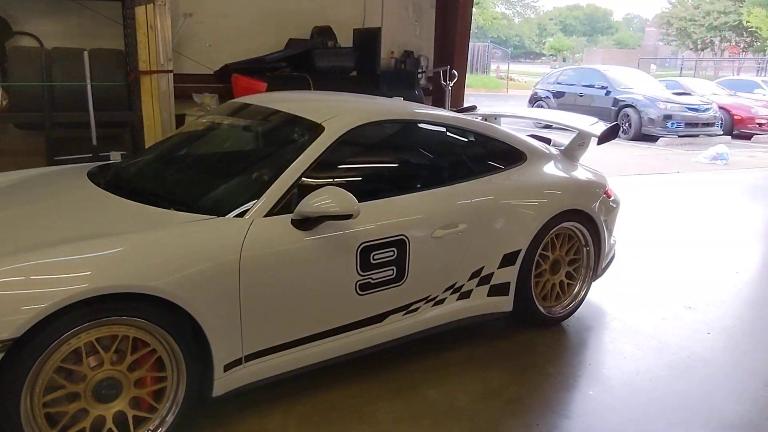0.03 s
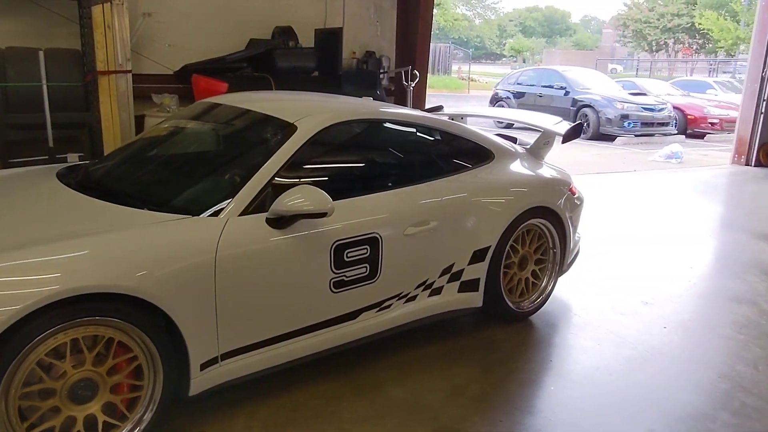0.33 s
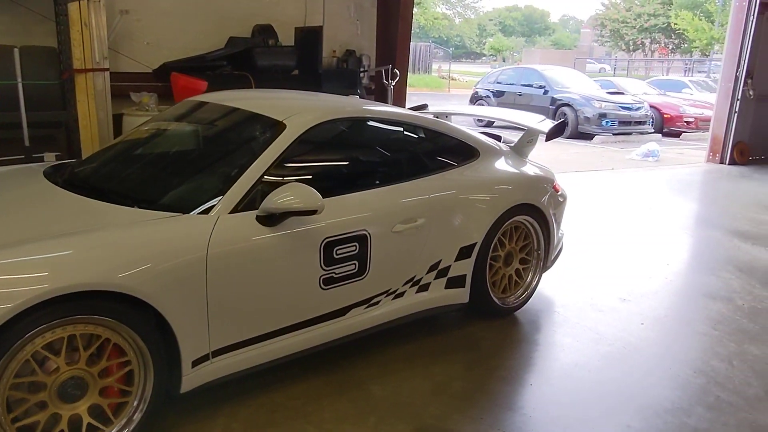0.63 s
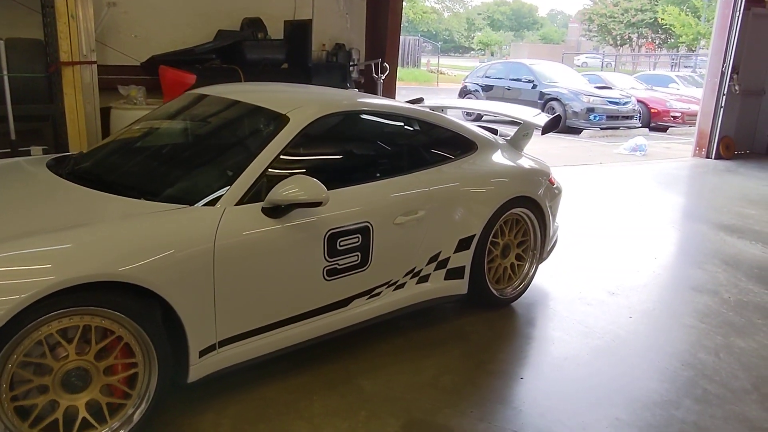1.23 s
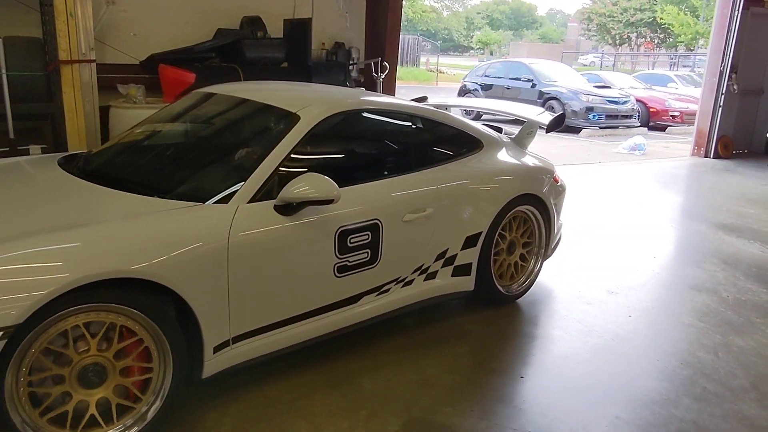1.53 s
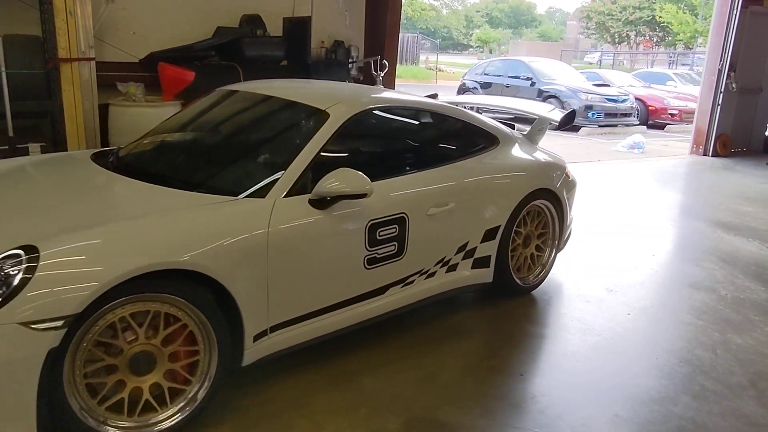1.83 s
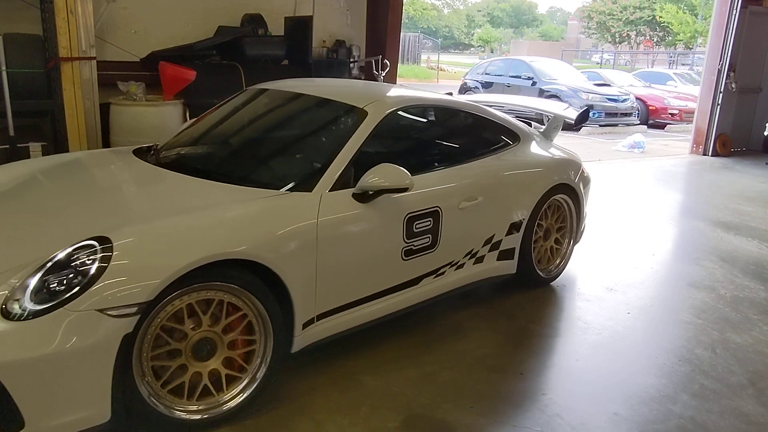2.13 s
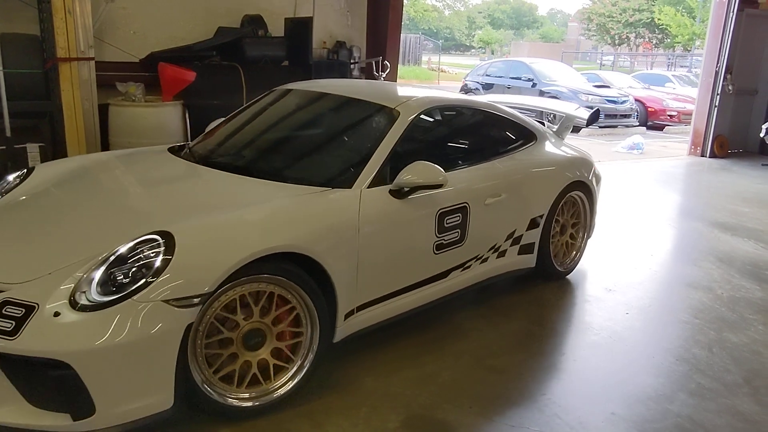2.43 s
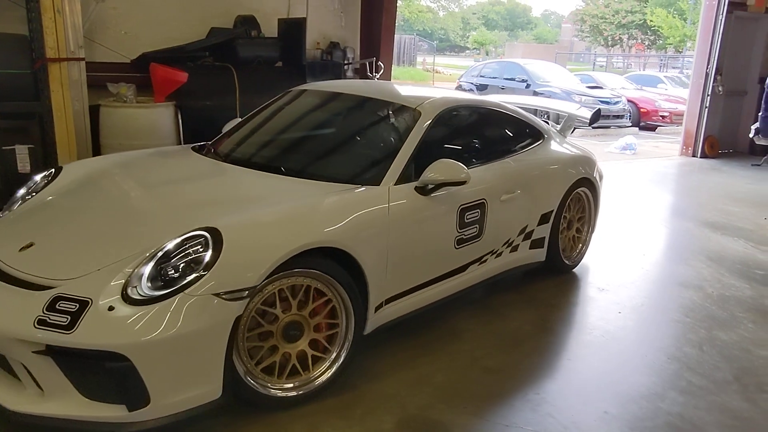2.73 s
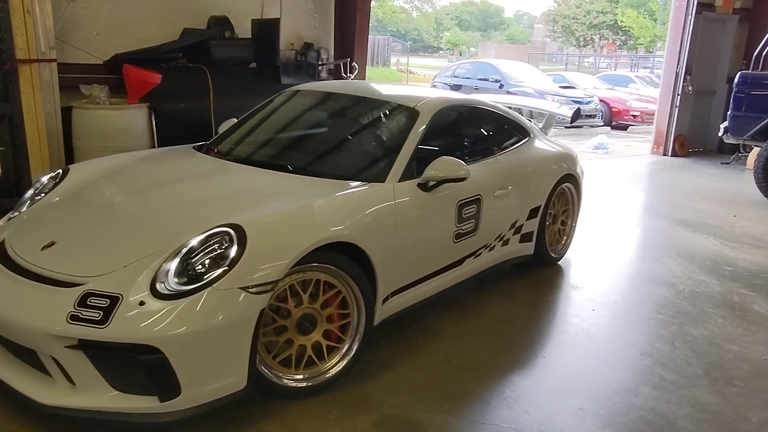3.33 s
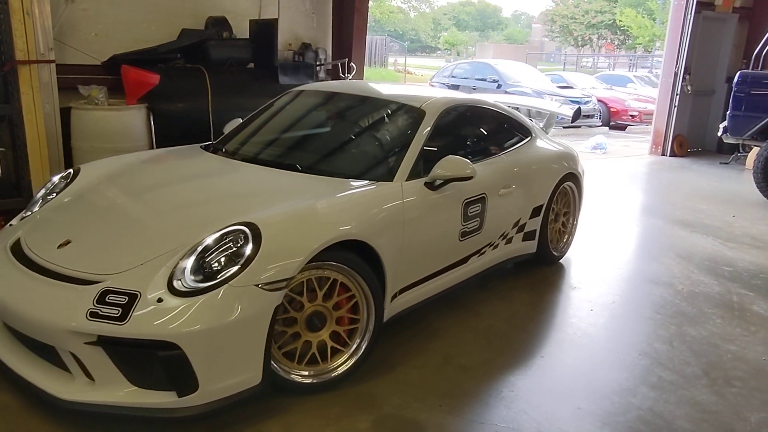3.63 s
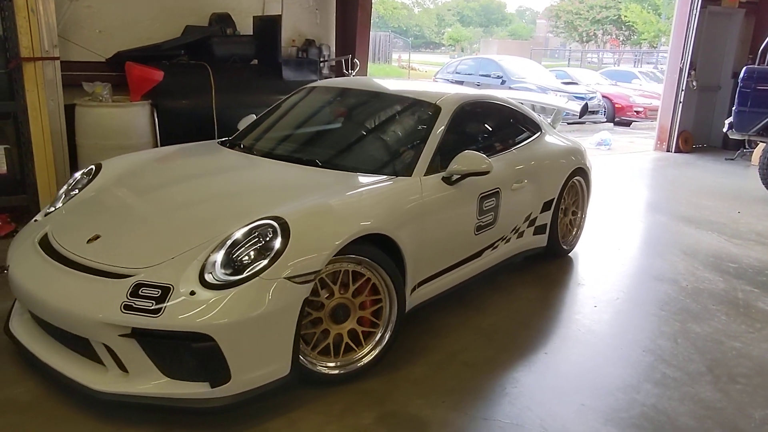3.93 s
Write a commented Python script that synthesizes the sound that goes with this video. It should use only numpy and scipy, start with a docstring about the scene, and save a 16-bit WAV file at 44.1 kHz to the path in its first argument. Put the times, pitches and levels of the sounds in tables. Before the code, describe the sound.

Low, burbling sports car engine runs as the car creeps along, tyres squeaking on smooth floor.

```python
"""A six-cylinder sports car creeps backwards out of a garage. It starts at idle: the exhaust drones,
uneven firings burble in the pipe, and the engine whirs and hisses. A soft scuff on the floor ends near
1 s, then the revs lift. From about 2 s they sag under the clutch while a tyre rubs and squeaks on the
smooth floor. The drone's tones swell and fade as the car moves through the room's standing waves
(its loud and quiet spots). In the last half second the revs recover."""
import sys
import numpy as np
from scipy import signal
from scipy.fft import rfft, irfft, next_fast_len
from scipy.io import wavfile
from scipy.ndimage import uniform_filter1d, minimum_filter1d, map_coordinates

SR = 44100
rng = np.random.default_rng(int(sys.argv[2]) if len(sys.argv) > 2 else 0)


def digitize_waveform(pressure):
    """Quantize a signal to 16-bit integers and store it at the path in sys.argv[1].

    Rows of a 2-D input are taken as channels; values are limited to [-1, 1].
    """
    field = np.atleast_2d(pressure).T
    bounded = np.clip(field, -1, 1)
    quanta = np.round(bounded * 32767).astype(np.int16)
    wavfile.write(sys.argv[1], SR, quanta)


N = 176400  # 4 s
TIME = np.arange(N) / SR


def amp(db):
    """Turn decibels into a gain."""
    return 10 ** (np.asarray(db) / 20)


def unit(x):
    """Scale a sound to an average (rms) size of 1."""
    return x / np.sqrt(np.mean(x ** 2) + 1e-20)


def along(points, hz):
    """Read a frequency table between its rows, on a log axis."""
    f, values = np.transpose(points)
    return np.interp(np.log(hz + 1), np.log(f + 1), values)


def curve(rows, column=1):
    """Read one column of a time table at every sample."""
    columns = np.transpose(rows)
    return np.interp(TIME, columns[0], columns[column])


def wobble(rate):
    """A smooth curve through `rate` random points a second."""
    return map_coordinates(rng.standard_normal(int(N * rate / SR) + 4), [TIME * rate])


def filtered(x, response):
    """Turn each frequency up or down by response(hz)."""
    size = next_fast_len(N + SR // 2)
    return irfft(rfft(x, size) * response(np.fft.rfftfreq(size, 1 / SR)), size)[..., :N]


def pan(db):
    """Add db on the left and take as much off the right."""
    return amp([[db], [-db]])


# How alike left and right are: f/Hz, likeness (1 = the same)
LIKENESS = [(60, .99), (250, 0.99), (500, 0.72), (1000, 0.49), (2000, 0), (6000, 0), (15000, 0)]

def rush(spectrum, pulse=1):
    """Stereo noise of size 1, pulsed and then given its tone colour."""
    def response(hz):
        width = np.arccos(np.clip(along(LIKENESS, hz), -1, 1)) / 2
        return amp(along(spectrum, hz)) * [np.cos(width), np.sin(width)]
    mid, side = filtered(pulse * rng.standard_normal((2, N)), response)
    return unit(np.array([mid + side, mid - side]))


# How long the echo takes to fall by 60 dB: f/Hz, t/s
ECHO_TIME = [(100, 0.78), (1000, 0.64), (4000, 0.69), (12000, 0.32)]

def garage(x):
    """The garage walls blur a sound into a stereo echo."""
    hz, t, noise = signal.stft(rng.standard_normal((2, SR)), SR, nperseg=256)
    fade = amp(-60 * t / along(ECHO_TIME, hz)[:, None])
    tail = signal.istft(noise * fade, SR, nperseg=256)[1]
    return signal.fftconvolve(x[None], tail / np.linalg.norm(tail[0]), axes=1)[:, :len(x)]


# Loudness of the whine: t/s, level/dB
WHINE_LEVEL = [(0, -80), (1.4, -72), (2.4, -68), (3.3, -65), (4, -70)]

def whine(pitch_hz=15109):
    """A faint, thin, very high tone."""
    return amp(curve(WHINE_LEVEL)) * np.sin(2 * np.pi * pitch_hz * TIME + wobble(30))


# Loudness of the hiss before its boosts: t/s, lower level/dB, upper level/dB
HISS_LEVEL = [(0, -56, -55), (.5, -54, -54), (1.05, -51, -54), (1.45, -48.5, -51), (1.8, -51, -48.5),
              (2.3, -54, -53), (2.55, -49, -53.5), (2.8, -55, -57.5), (3.12, -57.5, -59.5),
              (3.25, -50, -53.5), (3.6, -50.5, -53), (3.9, -47, -47.5)]
# Tone colour of the lower and upper hiss: f/Hz, level/dB
HISS_LOW = [(2000, -24), (3000, 3), (3700, -2), (4300, 1.5), (4800, -2), (5800, -1), (6700, 1.5),
            (7300, -0.5), (8000, -18), (10000, -34)]
HISS_HIGH = [(6000, -16), (7800, -2.5), (9000, 1), (9900, -3), (11100, -5.5), (11600, -0.5), (13000, -2),
             (15000, 0.5), (15700, -5)]

def hiss(cycles):
    """The engine bay hisses, pulsing faintly with every second firing."""
    pulse = 1 + .055 * np.cos(np.pi * cycles)
    lower = amp(curve(HISS_LEVEL) + 2) * rush(HISS_LOW, pulse)
    upper = amp(curve(HISS_LEVEL, column=2) + 4) * rush(HISS_HIGH, pulse)
    return lower + pan(-.6) * upper


# Loudness of the ringing: t/s, level/dB
RING_LEVEL = [(0, -47.5), (1.2, -47), (1.85, -43.5), (2.2, -48), (3, -54), (4, -46)]

def engine_ring(pitch_hz=1413, half_width_hz=42):
    """The engine's shaking keeps one narrow note ringing."""
    noise = rng.standard_normal((2, N))
    ring = filtered(noise, lambda hz: 1 / (1 + 1j * (hz - pitch_hz) / half_width_hz) ** 2)
    return amp(curve(RING_LEVEL)) * unit(ring)


# Tone colour of the scuff: f/Hz, level/dB
SCUFF_COLOUR = [(600, -24), (900, -4.5), (1200, 4), (1600, -11), (3200, -13), (5000, -20.5), (6500, -11.5),
                (8000, -22), (15000, -31)]

def scuff(start_s=.57, rise_s=.14, end_s=1.03, fall_s=.09, level_db=-40.5):
    """A soft rub on the floor rises, holds and falls."""
    shape = np.clip(np.minimum((TIME - start_s) / rise_s, (end_s - TIME) / fall_s), 0, 1)
    return amp(level_db) * shape * rush(SCUFF_COLOUR)


# Loudness of the rubbing: t/s, level/dB
RUB_LEVEL = [(0, -68), (2.15, -63), (2.45, -41), (2.8, -42.5), (3.08, -50), (3.27, -35.5), (3.6, -45.5),
             (3.9, -36), (4, -33)]
# Tone colour of the rubber: f/Hz, level/dB
RUB_COLOUR = [(550, -31), (770, -11), (865, 7), (940, -7), (1030, 3.5), (1180, -9), (1500, -25),
              (2000, -11.5), (3000, -35)]

def tyre_rub():
    """The tyres rub over the floor."""
    return amp(curve(RUB_LEVEL)) * rush(RUB_COLOUR)


# One squeak a row: start t/s, length t/s, first f/Hz, last f/Hz, level/dB, relative overtone level/dB
SQUEAKS = [(2.246, .06, 850, 880, -45, -14), (2.318, 0.092, 1040, 1090, -37, -12),
           (2.385, 0.12, 900, 896, -33, -15), (2.456, 0.045, 910, 967, -34, -3.5),
           (2.479, 0.042, 970, 1074, -30, -12), (2.528, 0.034, 1060, 1010, -29.5, -15),
           (2.579, 0.049, 1036, 1090, -38, -18), (2.585, 0.067, 893, 866, -30.5, -20),
           (3.237, 0.097, 860, 865, -36.5, -20), (3.311, 0.067, 770, 830, -43, -20)]

def tyre_squeaks(roughness=.035, echo_db=-7):
    """Rubber sticks and slips on the floor in short gliding squeaks that echo in the garage."""
    out = np.zeros(N)
    unsteady = 1 + roughness * wobble(250)
    for start, length, from_hz, to_hz, db, overtone_db in SQUEAKS:
        progress = np.clip((TIME - start) / length, 0, 1)
        pitch_hz = (from_hz + (to_hz - from_hz) * progress) * unsteady
        phase = 2 * np.pi * np.cumsum(pitch_hz) / SR
        tone = np.sin(phase) + amp(overtone_db) * np.sin(2 * phase)
        out += amp(db) * np.sin(np.pi * progress) * tone
    return out + amp(echo_db) * garage(out)


# Loudness of the whir before its boost: t/s, lower level/dB, upper level/dB
WHIR_LEVEL = [(0, -41.5, -47.5), (.5, -40, -47), (1.2, -41, -42), (1.8, -37.5, -42.5), (2.15, -39, -44),
              (2.4, -43, -44), (2.52, -44, -44), (2.7, -43.5, -44.5), (3.1, -45, -47.5), (3.3, -40, -42),
              (3.6, -38, -41), (3.9, -34, -39.5)]
# Tone colour of the lower and upper whir: f/Hz, level/dB
WHIR_LOW = [(100, -21), (300, 4), (450, 1), (600, -3.5), (720, 1.5), (850, -4), (950, -7.5), (1100, -8.5),
            (1400, -34.5), (2500, -39)]
WHIR_HIGH = [(500, -34.5), (900, -2), (1250, -2), (1420, 0.5), (1560, -8), (1750, -3.5), (2100, -5.5),
             (2350, -2.5), (2650, -12), (3200, -17), (4000, -34), (8000, -68)]

def whir(cycles, boost_db=4.5):
    """Flowing gas and moving parts whir, pulsing faintly with every second firing."""
    pulse = 1 + .09 * np.cos(np.pi * cycles)
    lower = amp(curve(WHIR_LEVEL)) * rush(WHIR_LOW, pulse)
    upper = amp(curve(WHIR_LEVEL, column=2)) * rush(WHIR_HIGH, pulse)
    return amp(boost_db) * (lower + upper)


# How much stronger or weaker than average each cylinder puffs (relative)
PUFF_OFFSETS = [0.69, -0.62, -0.23, 0.45, -0.26, 0.23]
# Tone colour of the exhaust pipe: f/Hz, level/dB
PIPE_COLOUR = [(20, -21), (40, -12), (75, -1.5), (110, -8), (150, -5), (190, 1.5), (235, 4), (275, -8.5),
               (330, -17.5), (420, -27), (600, -37.5), (1200, -66)]
# Loudness of the burble: t/s, level/dB
BURBLE_LEVEL = [(0, -27), (1.2, -26), (1.7, -23), (2.3, -24.5), (2.9, -28.5), (3.5, -25.5), (3.75, -19.5),
                (4, -18.5)]

def burble(cycles):
    """Unequal puffs make the exhaust pipe ring between the drone's tones, blurred by the garage."""
    firings = np.flatnonzero(np.diff(np.floor(cycles)))
    puffs = np.zeros(N)
    puffs[firings] = np.resize(PUFF_OFFSETS, len(firings)) + rng.standard_normal(N)[:len(firings)]
    running = np.concatenate([puffs[-SR:], puffs])  # the room is already ringing at the start
    echoing = garage(running)[:, SR:]
    mid, side = filtered(echoing, lambda hz: amp(along(PIPE_COLOUR, hz))) * [[1], [.13]]
    return amp(curve(BURBLE_LEVEL)) * unit(np.array([mid + side, mid - side]))


# Loudness of the tones at 1 to 5 times the firing rate: t/s, level/dB
BOOM = [(0.0, -19), (0.24, -17), (0.44, -14), (0.64, -16), (1.24, -15), (1.56, -15.2), (1.76, -11.6),
        (2.121, -16.5), (2.2, -29), (2.28, -18.5), (2.56, -17), (2.72, -21), (2.92, -45), (3.0, -29),
        (3.24, -40.9), (3.52, -34), (3.72, -15.3), (4.0, -12)]
OCTAVE = [(0.0, -30.5), (1.48, -28), (1.601, -31.5), (1.72, -15.5), (1.84, -23.5), (2.12, -21.5),
          (2.359, -32.5), (2.56, -26.5), (2.68, -40.5), (2.88, -32.5), (3.52, -26.0), (3.6, -45),
          (3.68, -25), (4.0, -16)]
GROWL = [(0.0, -27), (0.16, -21), (0.32, -25), (0.56, -20), (0.72, -25.7), (0.8, -17), (0.92, -41.5),
         (1.041, -15.5), (1.199, -25.0), (1.4, -10.0), (2.28, -16), (2.32, -21), (3.04, -32.5), (3.12, -42),
         (3.52, -31), (3.68, -13.5), (3.92, -22.5), (4.0, -5.5)]
UPPER_GROWL = [(0.0, -39.5), (0.32, -22), (0.6, -27), (1.001, -22), (1.12, -43), (1.199, -24.5),
               (1.68, -43), (1.8, -30.5), (2.28, -34), (2.48, -29.5), (2.8, -20.5), (3.0, -29), (3.6, -28),
               (4.0, -50)]
EDGE = [(0, -37.5), (1.45, -41), (1.75, -38), (2.05, -32.5), (2.25, -46), (2.75, -47), (3.15, -28),
        (3.35, -39), (3.5, -36), (3.65, -47), (4, -37)]
# How much each tone flutters, and how much it spreads left and right (shares of its size)
FLUTTER = [.03, .07, .11, .22, .25]
SPREAD = [.02, .08, .12, .14, .2]

def drone(cycles):
    """The exhaust hums in five tones; the room makes them flutter and spreads them a little."""
    out = np.zeros((2, N))
    levels = [BOOM, OCTAVE, GROWL, UPPER_GROWL, EDGE]
    for multiple, (level, depth, spread) in enumerate(zip(levels, FLUTTER, SPREAD), 1):
        flutter = 1 + depth * (wobble(16) + 1j * wobble(16))  # the 1j part nudges the wave's timing
        sides = 1 + spread * np.array([[1], [-1]]) * (.5 * wobble(3) + 1j * wobble(3.04))
        tone = np.exp(2j * np.pi * (multiple * cycles + rng.random()))
        out += amp(curve(level)) * unit(np.real(flutter * sides * tone))
    return out


# The revs, as firings a second: t/s, f/Hz
FIRING_RATE = [(0.0, 67.3), (0.44, 69.4), (0.56, 68.1), (0.96, 69.0), (1.08, 67.7), (1.28, 70.6),
               (1.36, 73.4), (1.6, 74.8), (1.72, 78.9), (1.92, 68.9), (2.04, 69.1), (2.52, 58.9),
               (3.2, 49.6), (3.28, 51.4), (3.48, 51.5), (3.6, 55.0), (3.84, 71.4), (4.0, 72.7)]

def scene():
    """One engine speed drives exhaust, whir and hiss; the tyres rub and squeak."""
    cycles = np.cumsum(curve(FIRING_RATE)) / SR  # goes up by one at each firing
    exhaust = pan(.2) * (drone(cycles) + burble(cycles))
    engine = exhaust + whir(cycles) + hiss(cycles)
    return engine + tyre_squeaks() + tyre_rub() + engine_ring() + scuff() + whine()


def record(dry, ceiling=.96, smooth_s=.02, top_hz=15750):
    """Gently turn down the loudest peaks and cut off the very highest treble."""
    size = int(smooth_s * SR)
    needed = ceiling / np.maximum(np.abs(dry).max(axis=0), ceiling)
    gain = uniform_filter1d(minimum_filter1d(needed, 2 * size), size)
    return filtered(dry * gain, lambda hz: hz < top_hz)


dry = scene()
out = record(dry)
digitize_waveform(out)
```